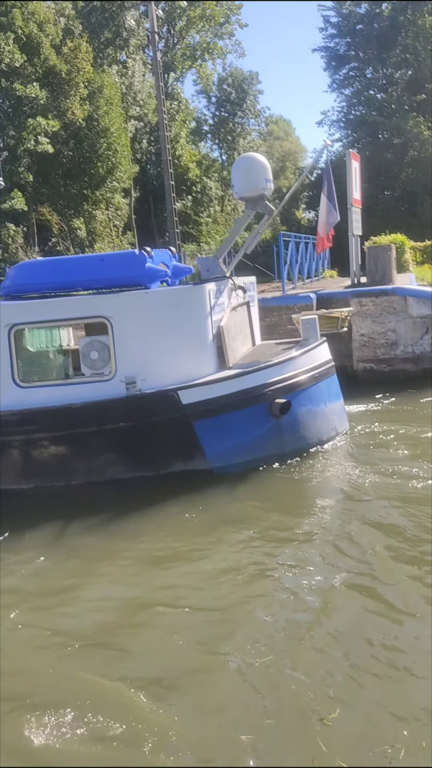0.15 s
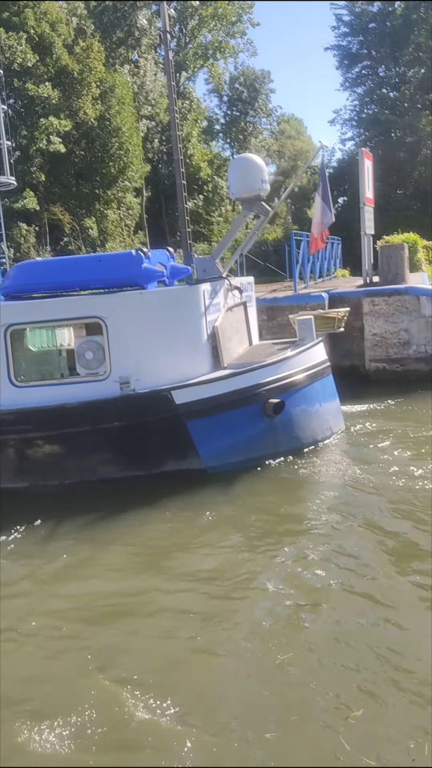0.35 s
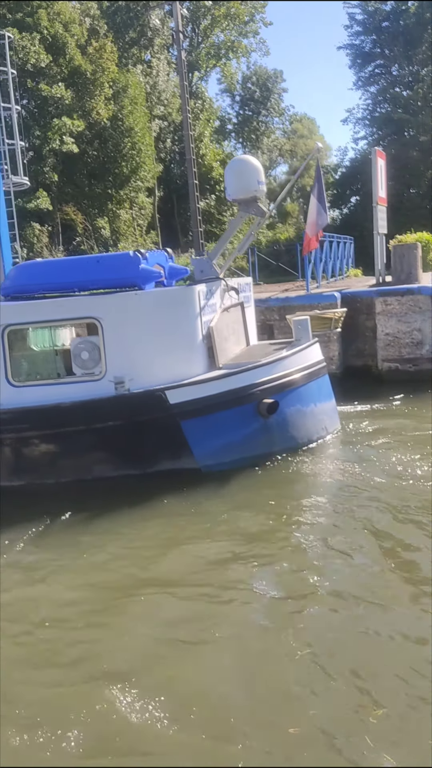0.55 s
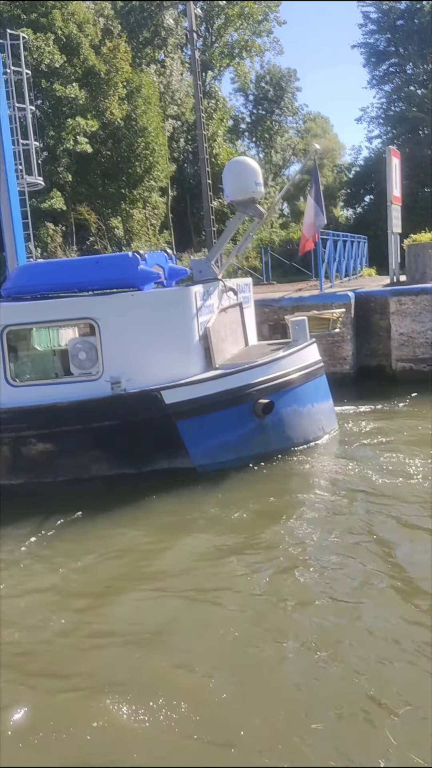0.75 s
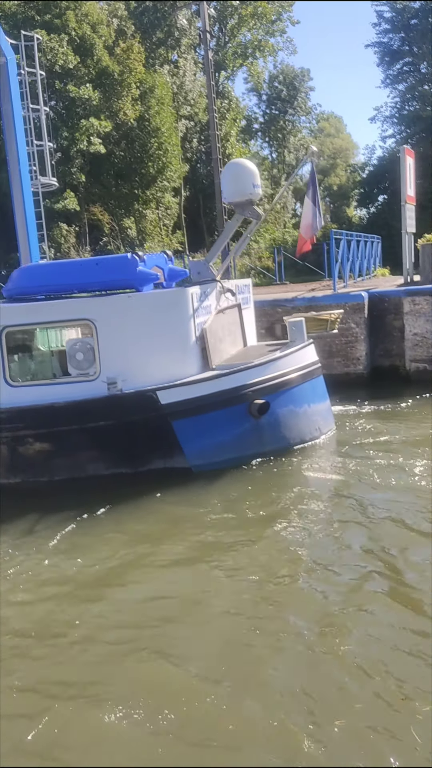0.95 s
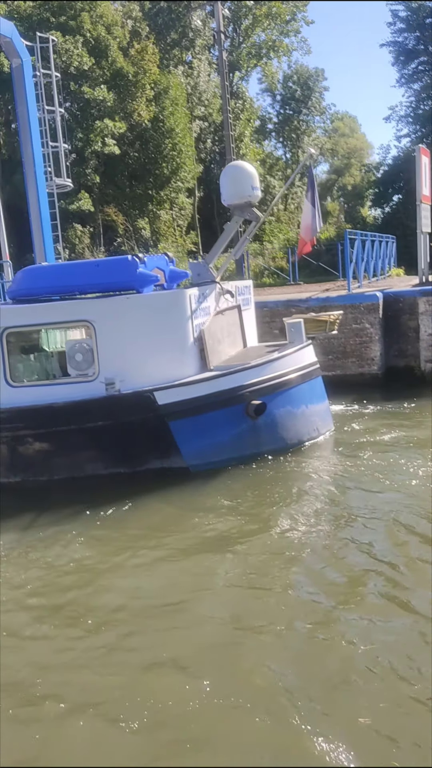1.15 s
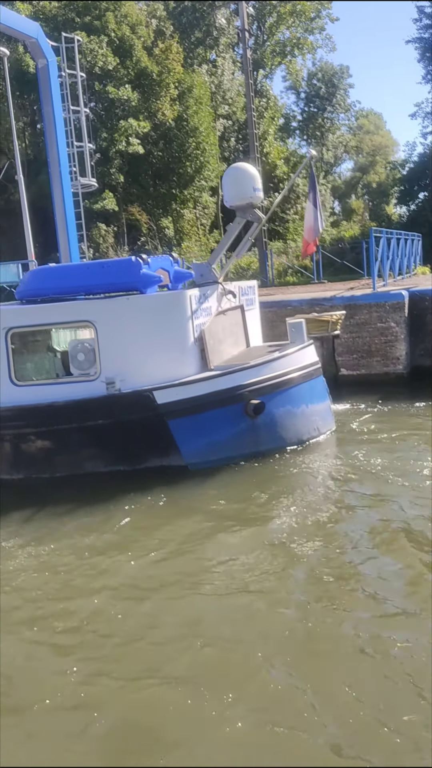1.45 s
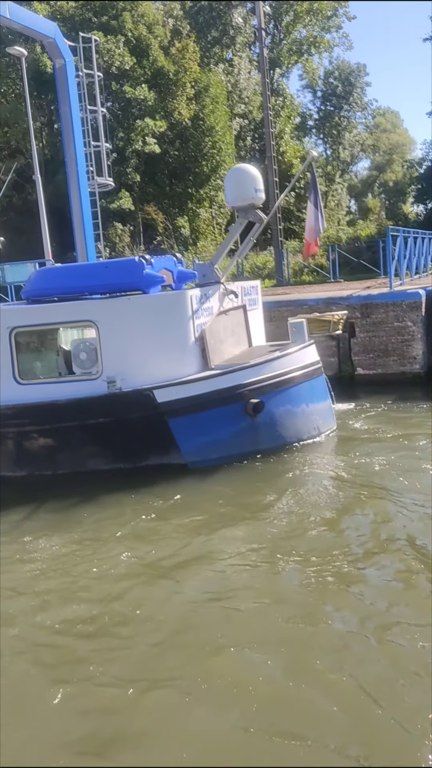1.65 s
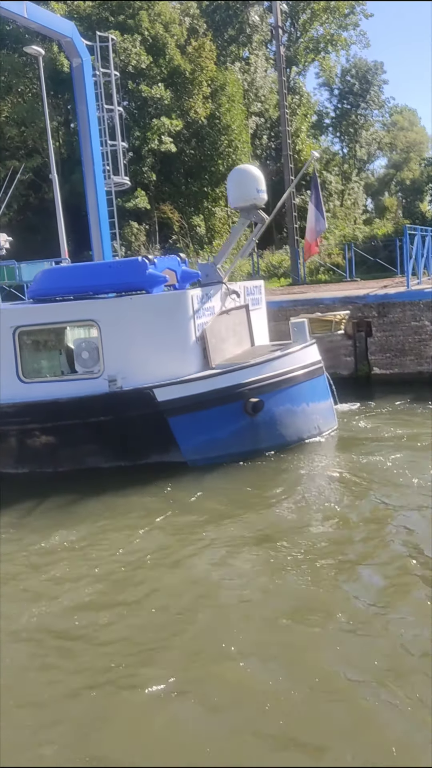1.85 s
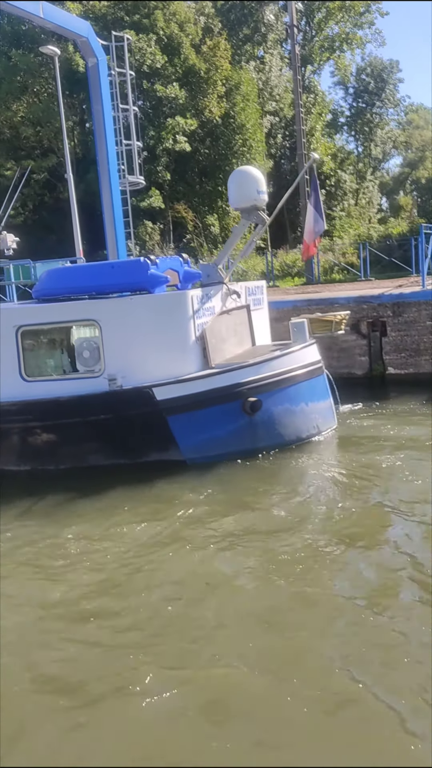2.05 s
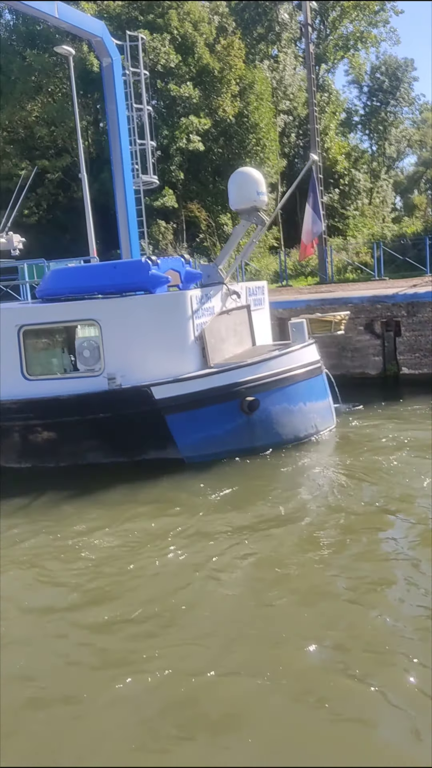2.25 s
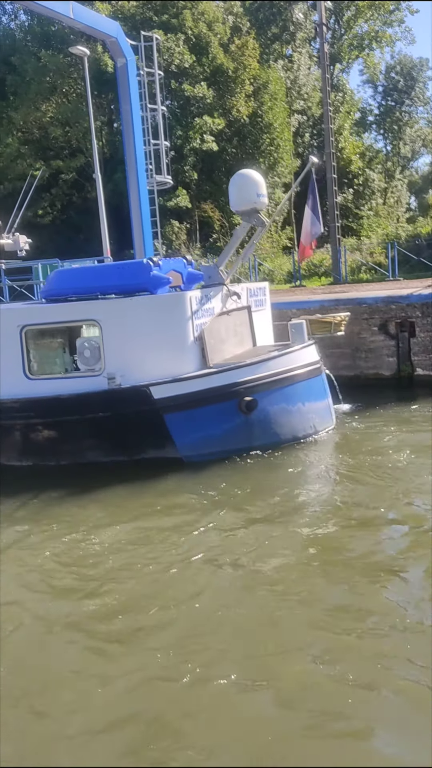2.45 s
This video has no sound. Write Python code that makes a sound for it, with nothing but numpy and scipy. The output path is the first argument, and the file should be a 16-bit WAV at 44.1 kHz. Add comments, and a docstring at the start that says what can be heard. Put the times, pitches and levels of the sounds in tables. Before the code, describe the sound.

A barge's diesel engine throbs at idle, clunks into gear, then revs up over churning water

```python
"""An idling six-cylinder diesel throbs, is put in gear near 1 s and opened up near 2 s, as a barge slides along a canal.
Exhaust: sines on orders of the engine cycle, plus pulses ringing the pipe. Hull: shaped noise and narrow hums.
Stern water: patchy hiss, tiny decaying sines for bubbles, short noise-and-sine spatters. A faint trill sounds early on.
A phone on the bank hears the bass stronger on the left and the hiss wide."""
import sys
import numpy as np
from scipy import signal
from scipy.fft import rfft, irfft, next_fast_len
from scipy.io import wavfile
from scipy.ndimage import uniform_filter1d, map_coordinates

SR = 44100
rng = np.random.default_rng(int(sys.argv[2]) if len(sys.argv) > 2 else 0)


def dump(signal):
    """Clip the signal to [-1, 1] and save it as 16-bit WAV at the path in sys.argv[1]."""
    limited = np.clip(np.atleast_2d(signal).T, -1, 1)
    pcm = np.round(limited * 32767).astype(np.int16)
    wavfile.write(sys.argv[1], SR, pcm)


def nominal_scale(level):
    """Amplitude ratio for a level in decibels (scalar or array-like)."""
    x = np.asarray(level, float) / 20
    return 10 ** x


N = 115101  # samples
CYLINDERS = 6


def unit(x):
    """Scale to rms 1."""
    return x / np.sqrt(np.mean(x ** 2) + 1e-20)


def along(points, hz):
    """Interpolate (Hz, value) points on a log frequency axis."""
    f, v = np.transpose(points)
    return np.interp(np.log(hz + 1), np.log(f + 1), v)


def curve(rows):
    """Interpolate (s, value) rows to one value per sample."""
    return np.interp(np.arange(N) / SR, *np.transpose(rows))


def wobble(knots_per_s):
    """Smooth random curve through normal-distributed knots."""
    at = np.arange(0, N + 64, 64)
    knots = rng.standard_normal(int(N * knots_per_s / SR) + 4)
    return np.interp(np.arange(N), at, map_coordinates(knots, [at * knots_per_s / SR]))


def filtered(x, response):
    """Multiply the spectrum of x by a response of frequency."""
    m = next_fast_len(N + SR // 2)
    return irfft(rfft(x, m) * response(np.fft.rfftfreq(m, 1 / SR)), m)[..., :N]


def narrow(hz, width_hz):
    """Noise through one resonance, twice over, rms 1."""
    def resonance(f):
        return (1j * f * width_hz / (hz * hz - f * f + 1j * f * width_hz)) ** 2
    return unit(filtered(rng.standard_normal(N), resonance))


# Stereo width of noise. Each row: frequency in Hz, left-right likeness (1 = mono).
LIKENESS = [(60, 0.33), (120, 0.81), (250, 0.87), (520, 1), (1080, 0.46), (2220, 0.27), (4560, 0.15),
            (9390, 0.036)]


def rush(spectrum, patchy_db):
    """Stereo noise with random gain patches in time and frequency, mid rms 1."""
    z = signal.stft(rng.standard_normal((2, N)), nperseg=512)[2]
    field = uniform_filter1d(rng.standard_normal(z.shape[1:]), size=6, axis=0)
    field = uniform_filter1d(field, size=10, axis=1)
    pair = signal.istft(z * nominal_scale(patchy_db * unit(field)), nperseg=512)[1][:, :N]

    def mid_side(hz):
        turn = np.arccos(np.clip(along(LIKENESS, hz), 0, 1)) / 2
        return nominal_scale(along(spectrum, hz)) * [np.cos(turn), np.sin(turn)]
    mid, side = filtered(pair, mid_side)
    return np.array([mid + side, mid - side]) / np.std(mid)


# Engine speed. Each row: time in seconds, firings per second.
FIRING_HZ = [(0.0, 25.8), (0.4, 25.95), (0.8, 26.0), (0.9, 26.3), (1.0, 27.4), (1.1, 27.5), (1.2, 27.4),
             (1.5, 27.53), (1.8, 27.05), (1.9, 28.17), (2.0, 29.06), (2.1, 31.0), (2.2, 32.75),
             (2.3, 33.65), (2.4, 34.38), (2.6, 34.95)]
# Engine load. Each row: time in seconds, load (0 idle, 1 in gear, 2 throttle open).
ENGINE_LOAD = [(0, 0), (.87, 0), (.95, .6), (1.04, 1.25), (1.2, 1.25), (1.28, 1), (1.94, 1), (2.02, 1.3),
               (2.1, 1.85), (2.25, 2), (2.61, 2.05)]


def crankshaft():
    """Firing rate, its integral counted in firings, and load: shared by all engine sounds."""
    firing_hz = curve(FIRING_HZ)
    first_firing = .14  # starting phase, firings
    return firing_hz, np.cumsum(firing_hz) / SR + first_firing, curve(ENGINE_LOAD)


# Exhaust tones. Each row: order of the engine cycle, rms before lift in dB at idle, in gear, throttle open.
ORDERS = [(6, -43, -48, -32), (7, -52, -52, -55), (8, -68, -68, -55), (10, -59, -72, -65),
          (11, -56, -64, -55), (12, -62, -43, -38), (13, -59, -60, -61), (15, -58, -59, -56),
          (17, -58, -54, -62), (18, -45, -56, -47), (19, -67, -67, -62), (20, -72, -70, -59),
          (21, -64, -60, -56), (22, -68, -65, -64), (23, -64, -61, -68), (24, -60, -61, -49),
          (25, -74, -63, -68), (26, -59, -63, -62), (27, -54, -65, -57), (28, -64, -69, -56),
          (30, -66, -63, -52), (32, -72, -68, -54), (33, -65, -68, -64), (34, -67, -64, -67),
          (35, -59, -67, -58), (36, -57, -56, -58), (38, -68, -59, -62), (39, -60, -63, -66),
          (40, -68, -65, -64), (41, -68, -65, -66), (42, -64, -66, -59), (46, -69, -70, -57)]
# Pipe resonances acting on the tones. Each row: frequency in Hz, width in Hz, lift in dB, phase turn in radians.
PIPE_LIFT = [(66, 10, 0, -.6), (107, 10, 10.5, 1.5), (186, 7, 10, 0)]


def exhaust(firing_hz, firing, load):
    """Orders of the firing rate align into one pulse a firing; uneven orders spread over the cycle and drift."""
    waver_db, wander_cycles, wander_knots_per_s = .7, .05, 3
    in_gear, throttle = np.minimum(load, 1), np.maximum(load - 1, 0)
    tones = np.zeros(N)
    for order, idle_db, gear_db, open_db in ORDERS:
        k = round(order)
        hz = k * firing_hz / CYLINDERS
        lift_db, turn = np.zeros(N), np.zeros(N)
        for center_hz, width_hz, peak_db, turn_rad in PIPE_LIFT:
            near = np.exp(-((hz - center_hz) / width_hz) ** 2)
            lift_db += near * peak_db
            turn += near * turn_rad
        db = idle_db + (gear_db - idle_db) * in_gear + (open_db - gear_db) * throttle + lift_db
        drift = wander_cycles * wobble(wander_knots_per_s) * (k % CYLINDERS > 0)
        cycles = k * firing / CYLINDERS + k * k / (2 * CYLINDERS) + drift
        level = np.sqrt(2) * nominal_scale(db + waver_db * wobble(4.89))
        tones -= level * np.cos(2 * np.pi * cycles + turn)
    return tones


# Pipe and hull resonances. Each row: frequency in Hz, width in Hz, gain in dB.
PIPE_MODES = [(110, 25, -5), (165, 22, -4), (187, 12, 0), (265, 30, -10)]


def ringing(firing, throttle):
    """Each firing, scattered in time and strength, strikes resonances of alternating sign."""
    base_db, per_throttle_db = -55.5, 2
    scatter_db, jitter = 3.5, .05  # jitter: share of a firing interval
    at = np.flatnonzero(np.diff(np.floor(firing)))
    late, strength = rng.standard_normal((2, len(at)))
    shift = np.round(jitter * late * np.gradient(at)).astype(int)
    pulses = np.zeros(N)
    pulses[np.clip(at + shift, 0, N - 1)] = -nominal_scale(scatter_db * strength)

    def pipe(f):
        return sum((-1) ** k * nominal_scale(db) * 1j * f * width / (hz * hz - f * f + 1j * f * width)
                   for k, (hz, width, db) in enumerate(PIPE_MODES))
    return unit(filtered(pulses, pipe)) * nominal_scale(base_db + per_throttle_db * throttle)


def swell(firing):
    """Slight gain swell with each firing."""
    return 1 + 0.057 * np.cos(2 * np.pi * firing)


# Hull drone spectrum. Each row: frequency in Hz, relative density in dB per Hz.
DRONE_SPECTRUM = [(140, -14), (240, -5.5), (333, -5), (363, -11), (396, -3), (420, -6.5), (453, -2.5),
                  (485, -7.5), (560, -7.5), (660, -5.5), (793, -5.5), (943, -7), (1110, -15), (1590, -14.5),
                  (1780, -21.5), (2100, -19.5), (2400, -30.5), (3120, -61), (5280, -120)]
# Hull plates. Each row: frequency in Hz, width in Hz, level in dB before waver and throttle.
PLATE_HUMS = [(513, 18, -61), (558, 28, -60), (800, 40, -54), (929, 26, -58), (969, 14, -63),
              (1230, 70, -61), (2094, 36, -72), (2842, 6, -77)]


def hull(firing, throttle):
    """Drone swelling with the firings, plus plates humming as wavering narrow noise bands."""
    drone_db, per_throttle_db, waver_db = -46.5, 1.5, 2.7
    drone = nominal_scale(drone_db) * swell(firing) * rush(DRONE_SPECTRUM, patchy_db=1)
    plates = sum(nominal_scale(db + waver_db * wobble(4.06)) * narrow(hz, width_hz) for hz, width_hz, db in PLATE_HUMS)
    return nominal_scale(per_throttle_db * throttle) * (drone + plates)


# Combustion knock spectrum. Each row: frequency in Hz, relative density in dB per Hz.
KNOCK_SPECTRUM = [(700, -26), (1000, 4), (1250, 3.5), (1500, -2.5), (2500, -9.5), (4000, -18), (5500, -35)]


def knock(firing, throttle):
    """Patchy noise swelling with the firings, harder as the throttle opens."""
    base_db, per_throttle_db = -65, 11
    return nominal_scale(base_db + per_throttle_db * throttle) * swell(firing) * rush(KNOCK_SPECTRUM, patchy_db=4)


# Rumble spectrum. Each row: frequency in Hz, relative density in dB per Hz.
RUMBLE_SPECTRUM = [(3, -12), (8, -3), (20, -2), (40, -3), (91, -4), (130, -5), (190, -5), (300, -16),
                   (390, -50), (660, -120)]


def rumble(load):
    """Low noise rising with load."""
    base_db, per_load_db = -53.5, 1.5
    return nominal_scale(base_db + per_load_db * load) * rush(RUMBLE_SPECTRUM, patchy_db=-1.5)


def surge(firing_hz):
    """Upper pipe resonance sings while speed rises: narrow noise, envelope flattened, level set by acceleration."""
    resonance_hz, width_hz = 187, 3
    base_db, db_per_hz_per_s, smoothing_s = -86, 2.6, .1
    span = round(smoothing_s * SR)
    accel = uniform_filter1d(np.gradient(firing_hz) * SR, size=span)
    accel = np.pad(accel, (span, 0))[:N]  # lags by the smoothing time
    tone = narrow(resonance_hz, width_hz)
    return nominal_scale(base_db + db_per_hz_per_s * accel) * tone / np.abs(signal.hilbert(tone))


def engine():
    """All engine sounds on one crankshaft."""
    firing_hz, firing, load = crankshaft()
    throttle = np.maximum(load - 1, 0)
    mono = exhaust(firing_hz, firing, load) + ringing(firing, throttle) + surge(firing_hz)
    return mono + hull(firing, throttle) + knock(firing, throttle) + rumble(load)


def fizz():
    """Tiny bursting bubbles: decaying sines at random times, pitches, sizes and pans, rms 1."""
    count, center_hz, spread, decay_cycles, tail_db = 1300, 7000, .4, 5, 2.5
    when, chance, pan = rng.uniform(size=(3, count, 1))
    hz = np.clip(center_hz * np.exp(spread * rng.standard_normal((count, 1))), 1500, 9300)
    t = np.arange(256) / SR
    size = nominal_scale(-tail_db * np.log(chance))  # few large, many small
    grain = size * np.sin(2 * np.pi * hz * t) * np.exp(-t * hz / decay_cycles)
    index = ((when * N).astype(int) + np.arange(len(t))).ravel()
    sides = (np.cos(pan * np.pi / 2), np.sin(pan * np.pi / 2))
    return unit(np.array([np.bincount(index, (grain * s).ravel(), N + len(t))[:N] for s in sides]))


# Spatters. Each row: start in seconds, level in dB before trim, frequency in Hz, left minus right in dB.
SPATTERS = [(.65, -50, 4200, 0), (.823, -47, 4200, -3), (1.3713, -46, 7640, -3.5), (1.4865, -39.5, 1600, 1),
            (1.4915, -45, 3100, 1), (1.497, -43, 2100, 1), (1.724, -45, 7000, -2), (1.8292, -44, 7500, -3),
            (1.9774, -45, 7000, -1.5), (1.991, -46, 7700, -1.5), (2.0168, -44, 7700, -2),
            (2.032, -45, 7800, -1), (2.0622, -37, 8400, 0), (2.163, -42, 8370, 0), (2.2214, -45, 3000, 0),
            (2.4345, -44, 5800, 1), (2.4365, -48, 3800, 1), (2.443, -45, 6500, 1), (2.4452, -37, 3600, 1.5),
            (2.451, -47, 7500, 1), (2.4575, -42.5, 3500, 1), (2.488, -44, 5000, 1)]


def spatters():
    """Single drops: a band-noise crack and a sine ring under one fast decay."""
    trim_db, ring_db, decay_s, attack_s = -5.5, 1, .003, .001
    out = np.zeros((2, N))
    t = np.arange(SR // 20) / SR
    envelope = np.exp(-t / decay_s) * np.minimum(t / attack_s, 1)
    for start_s, db, hz, pan_db in SPATTERS:
        band = signal.butter(2, [hz * .75, min(hz * 1.5, 11000)], "band", fs=SR, output="sos")
        crack = unit(signal.sosfilt(band, rng.standard_normal(len(t))))
        ring = nominal_scale(ring_db) * np.sin(2 * np.pi * hz * t)
        gain = nominal_scale(db + trim_db + np.array([[.5], [-.5]]) * pan_db)
        i = round(start_s * SR)
        out[:, i:i + len(t)] += gain * (crack + ring) * envelope
    return out


# Churning water spectrum. Each row: frequency in Hz, relative density in dB per Hz.
WASH_SPECTRUM = [(1180, -47), (2000, -2.5), (2170, -6), (2490, -5), (2740, -4), (2960, -7), (3650, -8.5),
                 (4310, -13), (4920, -9), (5360, -11.5), (6250, -13), (7690, -5.5), (9080, -10),
                 (9840, -24), (10400, -36), (12300, -30), (14000, -48), (16000, -90)]
# Wash level. Each row: time in seconds, level in dB before waver.
WASH_LEVEL = [(0.03, -59), (0.04, -57.5), (0.2, -62.5), (0.21, -59.5), (0.38, -61), (1.84, -58),
              (1.93, -60), (2.03, -58), (2.1, -57), (2.4, -55.5)]
# Treble of fizz and spatters. Each row: frequency in Hz, gain in dB.
DROPS_TREBLE = [(9000, 0), (10000, -14), (11000, -22), (14000, -30)]


def water():
    """Hiss and fizz on one wavering level, with spatters; fizz and spatters fall away steeply above 9 kHz."""
    fizz_db, waver_db = -11, 0.6
    level = nominal_scale(curve(WASH_LEVEL) + waver_db * wobble(8))
    drops = level * nominal_scale(fizz_db) * fizz() + spatters()
    hiss = level * rush(WASH_SPECTRUM, patchy_db=1.5)
    return hiss + filtered(drops, lambda hz: nominal_scale(along(DROPS_TREBLE, hz)))


# Trill. Each row: start in seconds, length in seconds, frequency in Hz, pulses per second, level in dB before fade.
TRILLS = [(0.211, 0.16, 7530, 38, -55)]


def trill():
    """Faint narrow hiss on the right, perhaps an insect, pulsing fast and fading."""
    width_hz, left_db = 500, -10
    t, out = np.arange(N) / SR, np.zeros(N)
    for start_s, length_s, hz, pulses_per_s, db in TRILLS:
        u = (t - start_s) / length_s
        fade = (u > 0) * (u < 1) * np.sqrt(np.abs(1 - u))
        pulse = np.sin(np.pi * pulses_per_s * (t - start_s)) ** 2
        out += nominal_scale(db) * fade * pulse * narrow(hz, width_hz)
    return out * nominal_scale([[left_db], [0]])


def scene():
    """Engine, water and the trill."""
    return engine() + water() + trill()


def roll_off(x):
    """The treble ends steeply here."""
    return signal.sosfilt(signal.butter(12, 14200, fs=SR, output="sos"), x)


# Microphone balance. Each row: frequency in Hz, left minus right in dB.
MIC_LEAN_DB = [(60, 5.5), (180, 5.8), (320, 4.5), (570, 3.5), (850, 4.5), (1200, 2), (1740, .8),
               (3050, -.5), (5000, -2.5), (7000, -5.5), (8500, 1), (11000, 4)]
# Microphone phase. Each row: frequency in Hz, left ahead of right in radians.
MIC_LEAD_RAD = [(60, -.05), (250, -.12), (700, -.25), (2000, 0), (5000, 0), (8000, .7)]


def record(dry):
    """Two microphones differ in level and phase by frequency: bass leans left, 3-7 kHz leans right."""
    half = np.array([[.5], [-.5]])

    def microphones(hz):
        return nominal_scale(half * along(MIC_LEAN_DB, hz)) * np.exp(1j * half * along(MIC_LEAD_RAD, hz))
    return roll_off(filtered(dry, microphones))


dry = scene()
out = record(dry)
dump(out)
```